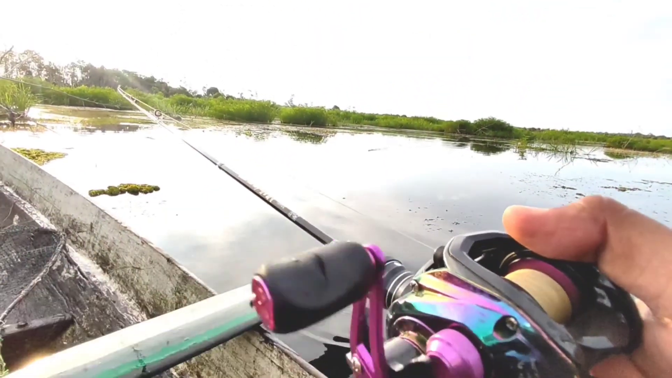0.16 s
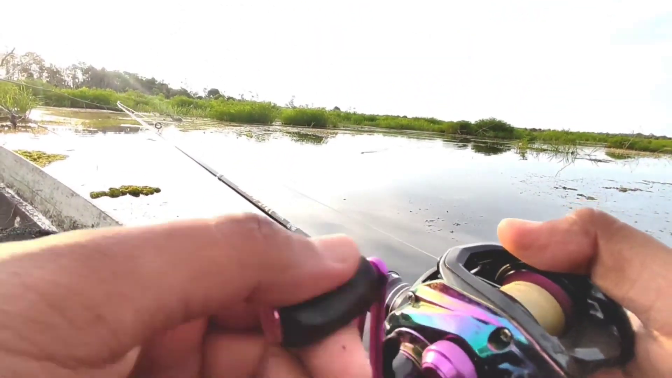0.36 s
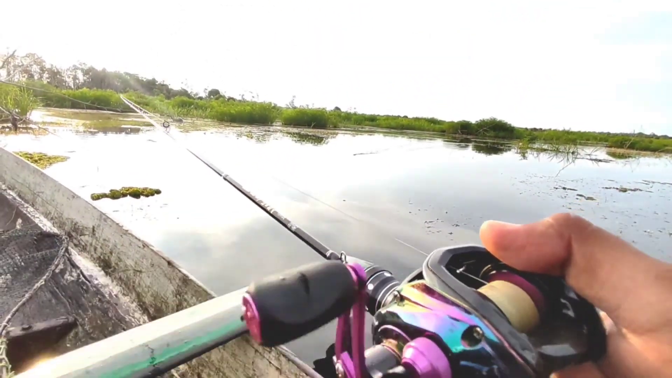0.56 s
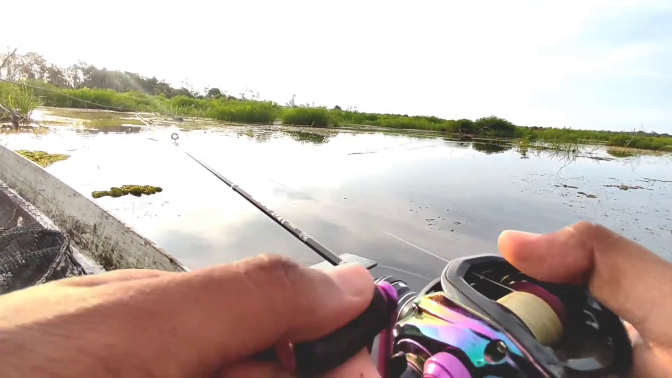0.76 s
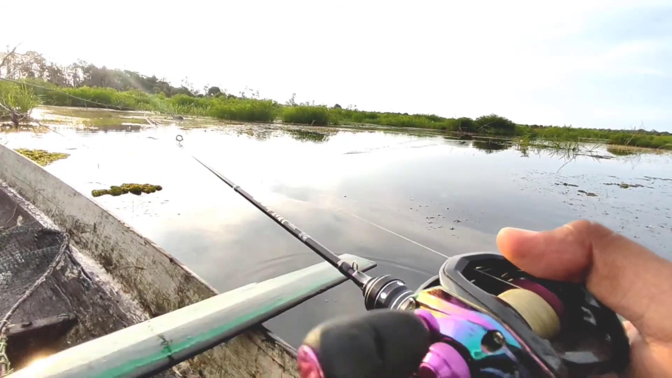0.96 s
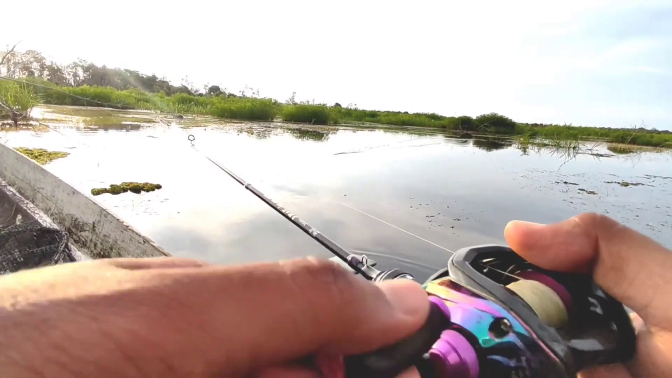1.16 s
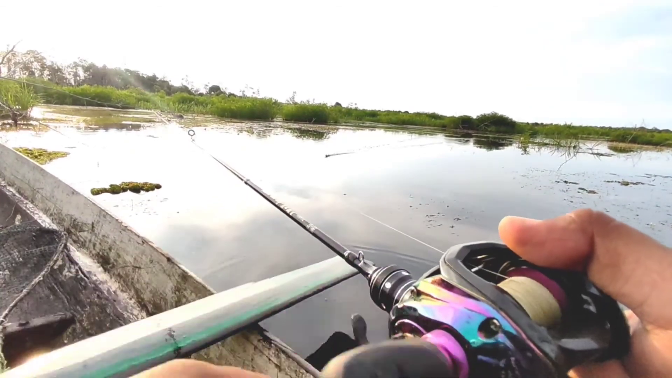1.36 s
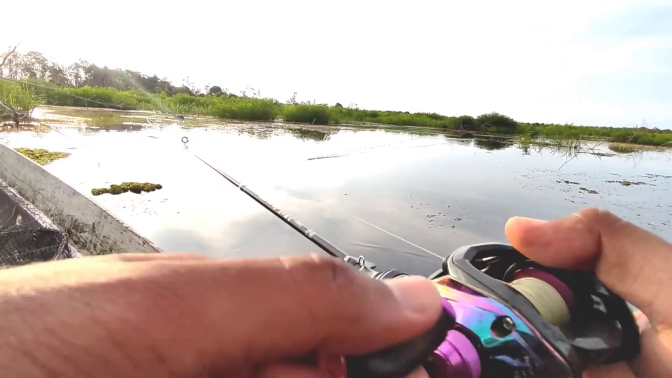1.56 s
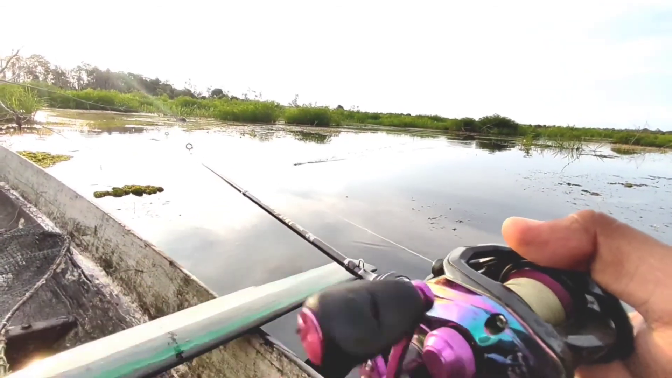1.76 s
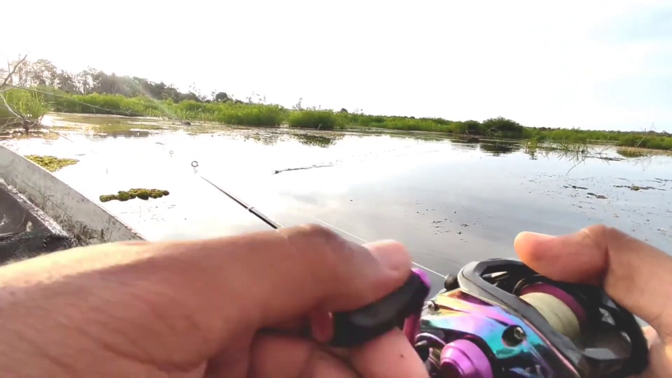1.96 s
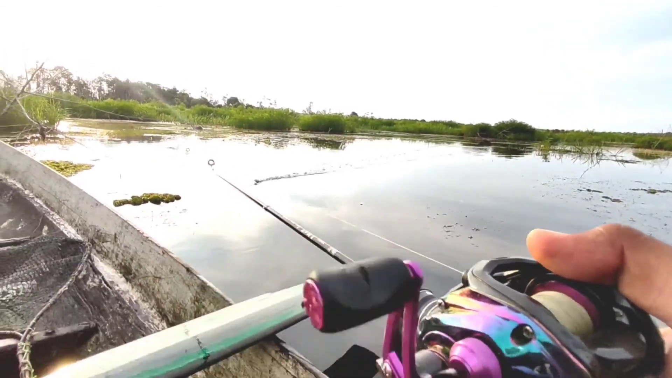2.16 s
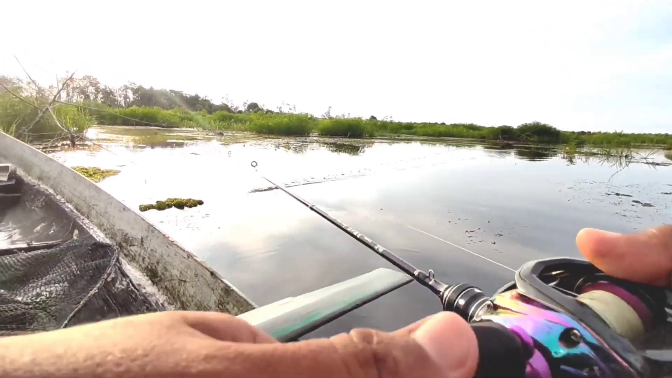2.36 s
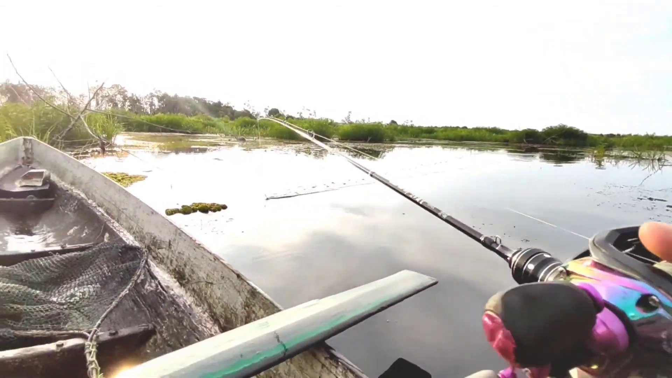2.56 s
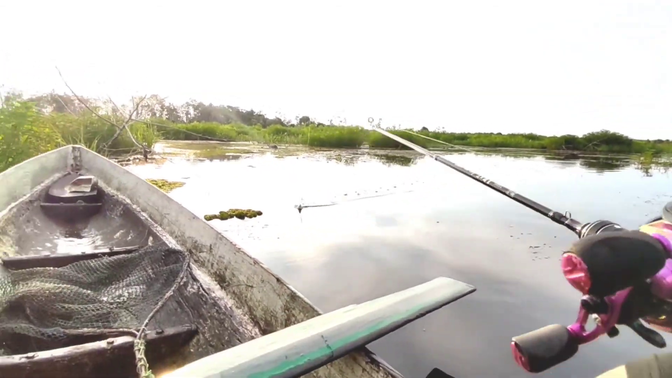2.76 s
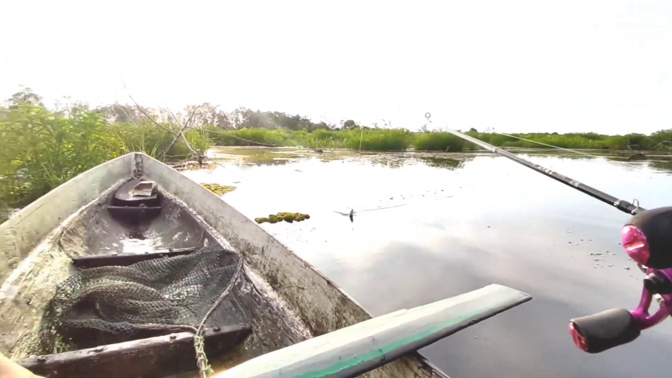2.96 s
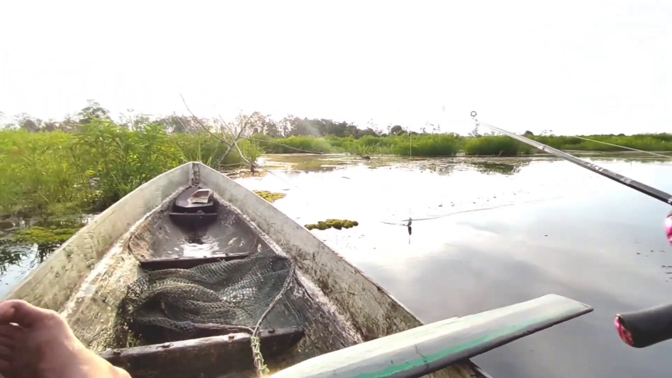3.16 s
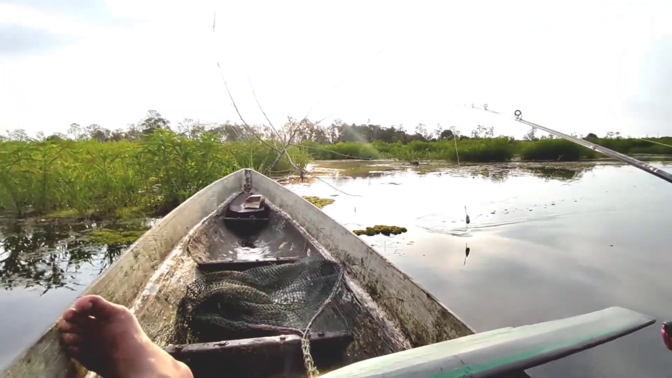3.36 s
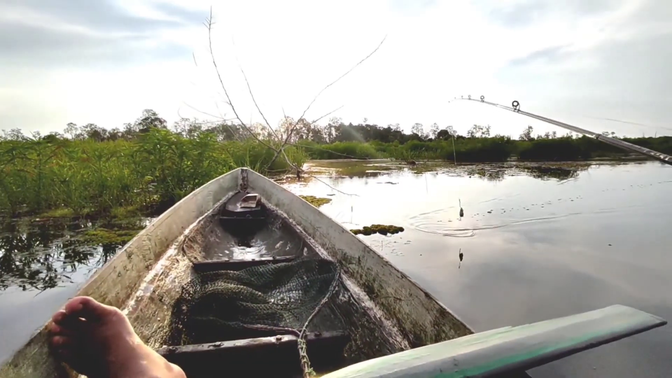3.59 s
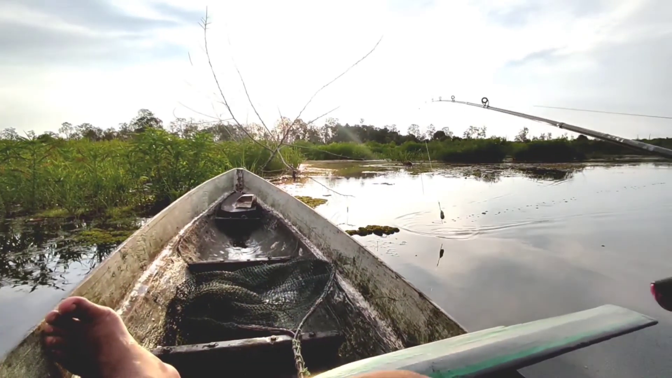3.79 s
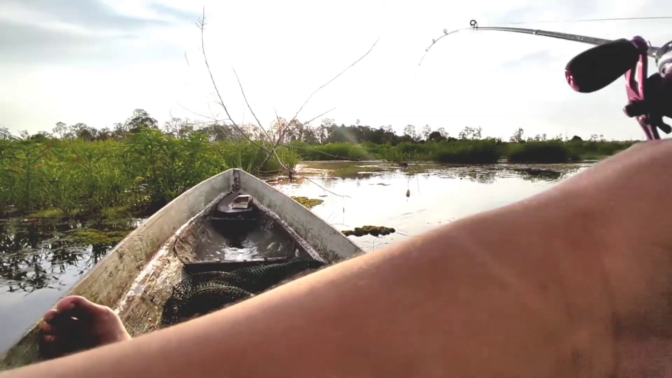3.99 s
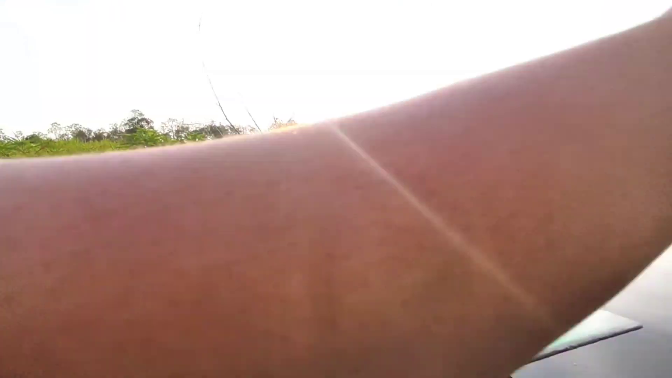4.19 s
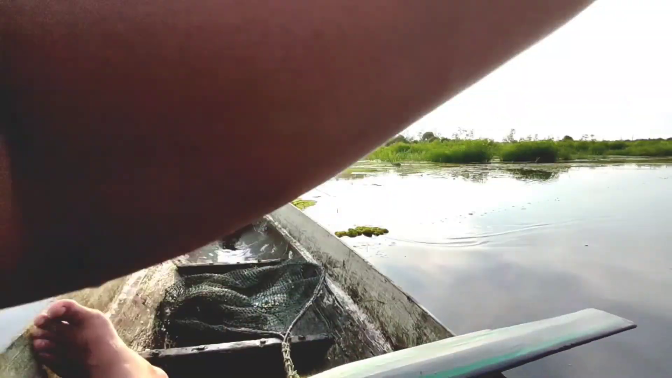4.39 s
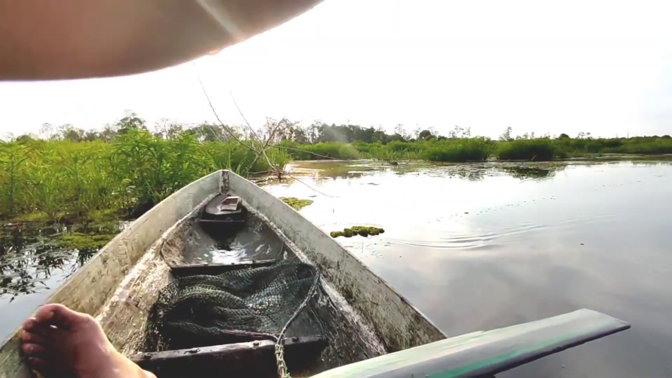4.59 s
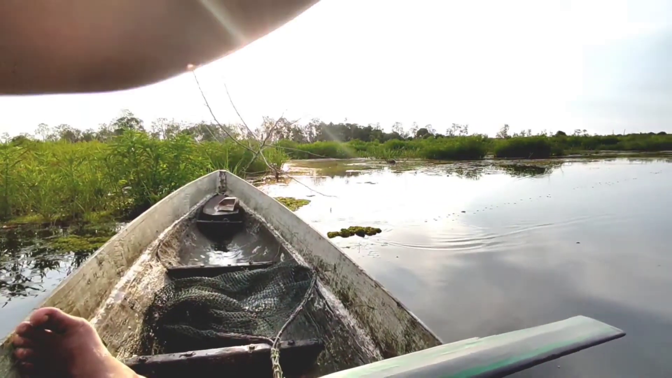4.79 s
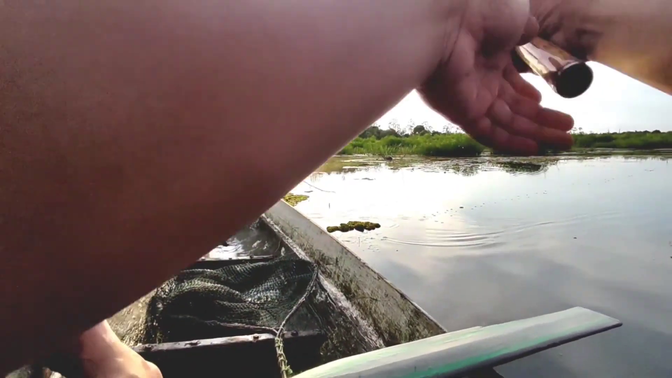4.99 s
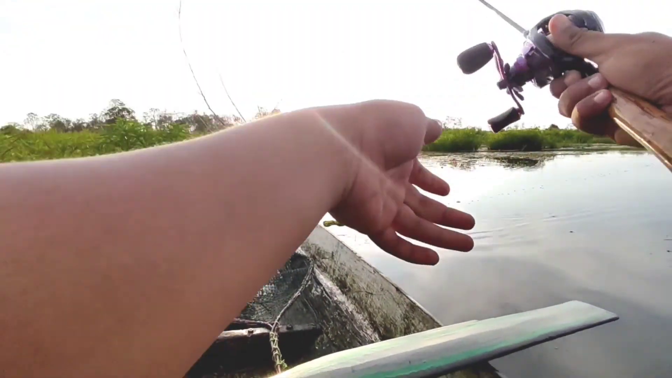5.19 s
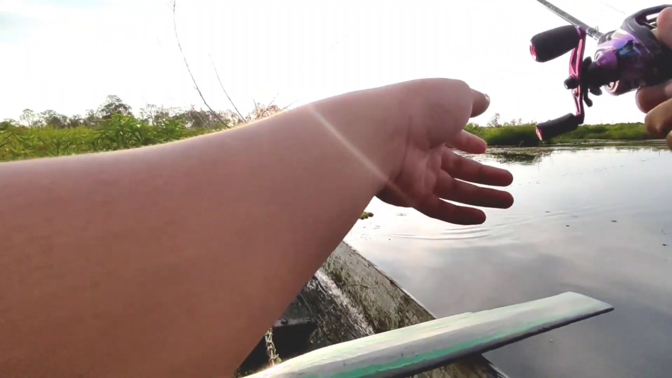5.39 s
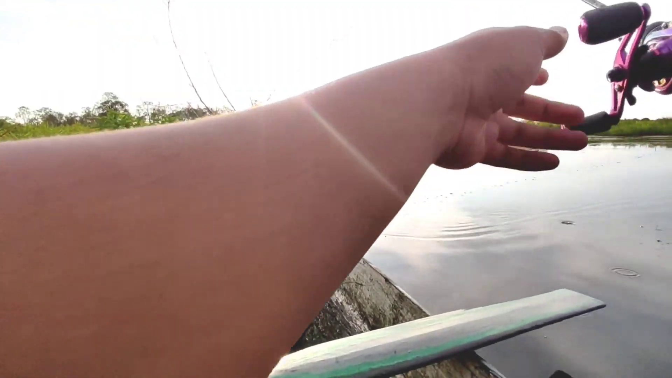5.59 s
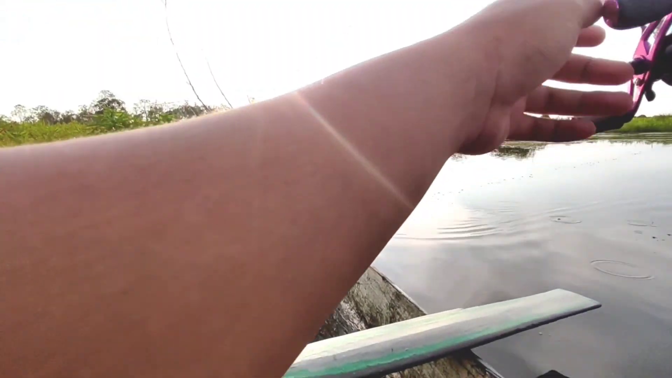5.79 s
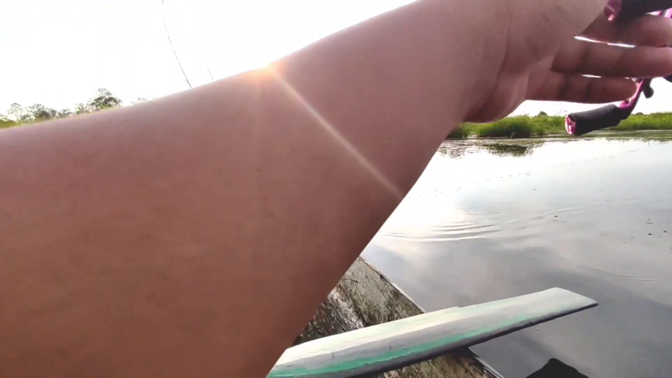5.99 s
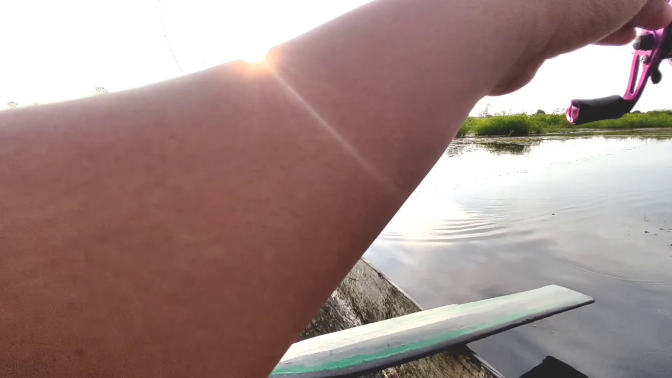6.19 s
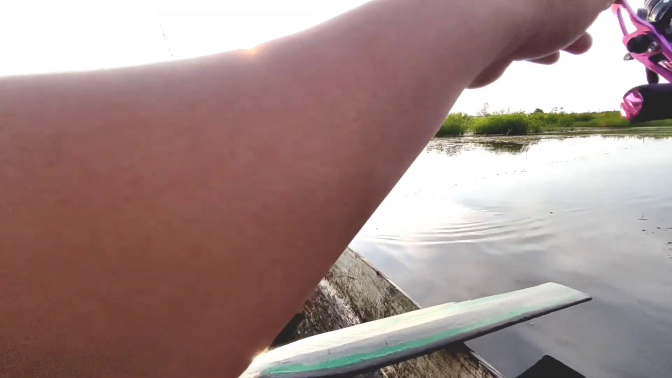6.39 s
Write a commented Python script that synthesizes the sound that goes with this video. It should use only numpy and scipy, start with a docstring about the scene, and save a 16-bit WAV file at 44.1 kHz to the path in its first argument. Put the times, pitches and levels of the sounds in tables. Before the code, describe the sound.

A fishing reel whirrs with dry ticks on a quiet marsh, then clatters to a stop; an arm rubs the microphone harshly and a knock ends it.

```python
"""A baitcasting reel whirrs and clicks in a small boat on a still marsh: coloured noise with dry ticks, plus whine.
Clicks of reel, rod, arm and finger ring short bright modes; the lure plops, then leaves the water with a soft hiss.
Behind lie marsh hiss, bird notes, insects buzzing thinly on the right and wind thumping the right port.
The angler's arm then rubs along the chest-worn camera as fluttering hiss and ringing snags;
a finger knocks the case and covers the microphone ports, which ducks the surroundings."""
import sys
import numpy as np
from scipy import signal
from scipy.fft import rfft, irfft, next_fast_len
from scipy.io import wavfile
from scipy.ndimage import uniform_filter1d

SR = 44100
rng = np.random.default_rng(int(sys.argv[2]) if len(sys.argv) > 2 else 0)


def output_pcm(signal):
    """Save a mono or channel-first signal as 16-bit PCM at the path in sys.argv[1].

    Samples are clipped to [-1, 1] before scaling.
    """
    pcm = np.clip(np.atleast_2d(signal).T, -1, 1) * 32767
    wavfile.write(sys.argv[1], SR, np.round(pcm).astype(np.int16))


N = 284445
TIME = np.arange(N) / SR

# Levels are re full scale ahead of any trim in the layer; colours are relative EQ curves.
# Open-air colour: [f/Hz, left level/dB, right level/dB]
AIR_COLOUR = [(26.6, -64.5, -57.5), (71.5, -79, -73.5), (200, -85, -90), (497, -91, -90),
              (1300, -97.5, -98.5), (2700, -95.5, -95.5), (5500, -99, -98), (6120, -103, -101),
              (7230, -97, -90.5), (8900, -85.5, -77.5), (10750, -86.5, -92.5), (11770, -93.5, -104),
              (14000, -102, -104)]
# Wind puffs: [t/s, push peak level/dB, push half width/ms, rumble level/dB, rumble rise and fall/s]
PUFFS = [(0.165, -25, 3.2, -56, 0.05), (0.713, -24, 2.5, -54, 0.05), (0.757, -22, 5, -45, 0.14),
         (1.077, -21, 6, -47, 0.08), (1.395, -26, 3, -50, 0.05), (1.548, -21, 2.2, -46, 0.06),
         (1.814, -17.5, 2.9, -45, 0.05), (1.847, -21, 3.2, -46, 0.06), (1.887, -23, 4.4, -44, 0.13),
         (2.032, -22.5, 4.2, -48, 0.08), (2.073, -21, 4.6, -47.5, 0.14), (2.278, -25, 6.4, -50, 0.06),
         (2.767, -24, 3.5, -48, 0.05), (2.804, -27, 7, -46, 0.12), (3.054, -25, 5, -50, 0.08),
         (3.354, -15.5, 2, -42, 0.08), (3.607, -17.5, 2.8, -46, 0.08), (4.2, -21.5, 4, -52, 0.04),
         (4.588, -19, 3.7, -43, 0.09), (4.638, -20, 4.5, -37.5, 0.07), (4.708, -15, 2.3, -37, 0.06),
         (4.793, -23, 5.7, -51, 0.05), (5.205, -21, 2, -45, 0.15), (5.357, -19.5, 2, -46, 0.06),
         (5.411, -15.5, 4.7, -43, 0.08), (5.457, -13.5, 2.9, -37, 0.09), (5.471, -19, 1.8, -46, 0.04),
         (5.509, -19, 2.1, -43, 0.12)]
BREEZE_DB = -58   # steady rumble under the puffs
# Louder insect bouts: [peak t/s, rise/s, fall/s, level/dB]
INSECT_BOUTS = [(3.1, 0.25, 0.7, -42), (4.92, 0.2, 1.0, -46)]
INSECT_HZ, GROUP_STROKES_PER_S, INSECT_DB = 8880, 169, -44.5   # steady buzz; stroke rate within a group
# Arm passing before the ports: [deepest t/s, rise/s, fall/s, insect loss level/dB, air and wind loss level/dB]
ARM_PASSES = [(4.4, 0.45, 0.4, 5.5, 3), (6.25, 0.35, 0.6, 17, 4.5)]

# Quick bird notes, one swell: [peak t/s, rise/s, fall/s, level/dB]
TRILL_SWELL = (3.88, 0.14, 0.18, -60)
TRILL_HZ, TRILL_SAG_HZ_PER_S, TRILL_NOTES_PER_S = 3110, 600, 40   # pitch at the peak of the swell
# Small bird's rising chirp: [start t/s, length/s, start f/Hz, end f/Hz, level/dB]
CHIRP = (4.738, 0.04, 2900, 3900, -59)
# Nasal bird call, one swell: [peak t/s, rise/s, fall/s, level/dB]
CALL_SWELL = (3.335, 0.155, 0.034, -49.5)
# Its fundamental, which dips, recovers and sags: [t/s, f/Hz]
CALL_PITCH = [(3.2, 852), (3.218, 842), (3.248, 860), (3.27, 812), (3.288, 864), (3.322, 846), (3.352, 820)]
# Resonances of the bird's throat: [f/Hz, level/dB]
THROAT = [(1700, -14), (2500, 0), (3350, -3.5), (4200, -2), (5100, -3.5), (5720, 4), (6050, -10),
          (6800, -13), (8200, -4), (8700, -9)]

# Bubbles where the lure plops at the surface: [t/s, starting f/Hz, level/dB]
PLOPS = [(1.571, 1040, -41), (1.756, 1930, -40), (1.802, 1080, -43), (1.809, 1450, -49), (2.033, 1040, -42),
         (2.036, 1370, -42), (2.165, 1090, -46), (2.185, 1380, -48)]
# Lure drawn out of the water, one swell: [peak t/s, rise/s, fall/s, level/dB]
LURE_SWELL = (3.13, 0.22, 0.27, -56)

# Light cloth rustles as the arm rises: [peak t/s, rise/s, fall/s, level/dB]
RUSTLES = [(3.73, 0.08, 0.08, -44.5), (3.95, 0.2, 0.18, -41)]
# Rustle colour: [f/Hz, left level/dB, right level/dB]
RUSTLE_COLOUR = [(150, 0, -4), (800, -9, -9.5), (1490, -15, -14), (3100, -11, -9), (4700, -12, -16),
                 (8400, -9, 0), (10800, 5.5, -5), (12300, -2, -10), (13300, 4.5, -7)]
# Arm on camera, a brush, long stroke, harder push and last slide: [peak t/s, rise/s, fall/s, level/dB]
RUBS = [(4.995, 0.1, 0.08, -40), (5.42, 0.55, 0.81, -32.6), (5.55, 0.1, 0.1, -34), (5.93, 0.2, 0.25, -39)]
# Colour of rubbing skin and cloth: [f/Hz, left level/dB, right level/dB]
RUB_COLOUR = [(260, -28, -24), (850, -19.5, -24), (1360, -35, -30), (1850, -21, -22), (3300, -25, -25),
              (4650, -26, -26), (5400, -15.5, -16.5), (6900, -19, -20), (8150, -10, 0), (9500, -5, -6),
              (10660, 3.5, -9), (13000, -13, -24), (14100, -5, -17)]
# Microphone port resonances, left then right: [f/Hz, t60 of one resonator/s]
PORTS = [(10530, 0.0022), (8850, 0.0027)]
# Big snags at the left port: [t/s, peak level/dB]
SNAGS = [(5.371, -13), (5.379, -13), (5.407, -12), (5.4205, -14), (5.4298, -9), (5.4724, -4.5),
         (5.4882, -8), (5.4985, -7), (5.5095, -10), (5.5145, -10), (5.5635, -13), (5.5855, -11),
         (5.598, -9), (5.6775, -12), (5.718, -12)]
# Skin chattering across the right port: [peak t/s, rise/s, fall/s, level/dB]
CHATTERS = [(5.285, 0.15, 0.09, -25.3), (5.66, 0.12, 0.13, -29.5)]
# Dull scuffs where the arm presses: [peak t/s, rise/s, fall/s, level/dB]
SCUFFS = [(5.0, 0.11, 0.1, -38.5), (5.14, 0.12, 0.25, -44)]
# Dull body colour of scuffs and clicks: [f/Hz, left level/dB, right level/dB]
BODY_COLOUR = [(200, -14, -21), (400, -11.5, -7.5), (770, -1, 2), (1330, -7.5, -9), (2760, 0, -3.5),
               (5730, -1, 0), (7940, 1, -3), (12000, -27, -17)]
# Ringing hollows between arm and camera: [peak t/s, rise/s, fall/s, level/dB, f at peak/Hz, glide/Hz per s]
HOLLOWS = [(5.38, 0.28, 0.6, -47, 3970, -400), (5.53, 0.4, 0.45, -48.3, 2650, 100),
           (5.6, 0.35, 0.4, -55, 1880, 0)]
# Faint hum of rubbed skin, one swell: [peak t/s, rise/s, fall/s, level/dB]
HUM_SWELL = (5.28, 0.33, 0.27, -55)
HUM_HZ, HUM_SAG_HZ_PER_S = 253, 135   # pitch at the peak of the swell, sinking as the arm slows

# Knocks on the camera case: [t/s, blow level/dB]
KNOCKS = [(4.0238, -35.5), (6.288, -31), (6.3283, -11.5)]
# Modes of the struck case: [f/Hz, level/dB, t60/s]
CASE_MODES = [(620, -18, 0.018), (830, -17, 0.016), (2860, -14.5, 0.02), (5240, 3, 0.015),
              (8050, -8, 0.028), (9300, 2, 0.017), (11750, 4, 0.014)]
# Finger pressing the left port, then shifting: [t/s, pressure step re full scale, leak time/s]
PRESSES = [(6.328, -0.5, 0.011), (6.4287, 0.5, 0.07)]
PRESS_RISE_S, MIC_LOW_CUT_HZ = 0.002, 3
COVER_S, COVER_DB = 6.35, -18   # the finger covers the ports

# Stopped handle rattling in its play: [t/s, first bounce level/dB, loss per bounce level/dB]
RATTLES = [(2.4817, -22, 1.8), (2.5502, -35, 6)]
BOUNCE_S = 0.0026   # nominal spacing
# Modes of the handle: [f/Hz, level/dB, t60/s]
HANDLE_MODES = [(1222, -24, 0.09), (1540, -22, 0.025), (2150, -17, 0.02), (3400, -13, 0.022),
                (5604, -11, 0.022), (6794, -5, 0.02), (8043, -2, 0.02), (8750, -1, 0.013), (9878, 0, 0.02),
                (10600, 1, 0.017), (11250, -3, 0.018)]
# Clicks of reel and rod, then of arm and finger on the camera: [t/s, onset level/dB, decay/ms,
# left-right level/dB, body level re onset/dB, f of the touched part/Hz, level of its ring/dB]
CLICKS = [(0.278, -41, 1.5, -2, 3, 2500, -40), (0.331, -37, 2, -1, -7, 2300, -37),
          (0.441, -29.5, 1.2, -6, -2, 4200, -32), (0.972, -39, 2, -7, 2, 4400, -40),
          (1.2441, -21, 1.5, -5, -19, 7900, -22), (1.394, -44, 2, 0, 5, 3700, -42),
          (1.498, -36, 1.8, 3, -3, 3700, -35), (2.046, -35, 2.5, -3, -6, 2400, -36),
          (2.1567, -28, 1.2, -3, -12, 8550, -18), (2.4664, -26, 1.7, -4, -9, 2050, -29),
          (2.470, -31, 2, 2, -4, 6300, -34), (2.4815, -19, 3, 2, -15, 10600, -18),
          (2.4864, -28, 7, -5, -5, 3400, -30), (2.5392, -17, 2.1, -4, -22, 7900, -16),
          (2.5505, -29, 2.5, -1, -5, 2750, -29), (2.6014, -30, 2.3, -1, -16, 4100, -39),
          (2.7338, -24, 2.3, 4, -20, 5400, -19), (2.7346, -30, 1.5, 4, -20, 7200, -20),
          (2.7933, -33.5, 1.9, 4, -10, 8850, -27), (2.8601, -31, 2.5, 12, -14, 3200, -42),
          (2.9208, -30, 2.2, 14, -14, 5400, -40), (4.0198, -5.5, 1.4, 24, -26, 3100, -20),
          (4.0234, -9, 1.9, 0, -20, 8800, -10), (4.026, -14, 1.2, 6, -22, 3500, -26),
          (4.9116, -27, 1.6, 3, -6, 6300, -34), (4.925, -30, 2.4, 8, -3, 900, -33),
          (5.014, -26, 3, 3, -3, 6300, -28), (5.665, -22, 1, 0, -30, 8750, -15),
          (5.8485, -19, 1.2, -4, -30, 7200, -18), (6.0786, -21, 2.3, 13, -21, 11000, -22),
          (6.256, -52, 7, 3, 7, 1450, -44), (6.2878, -23, 2.3, 5, -16, 2800, -28),
          (6.328, -1.5, 1.6, 9.5, -13, 2860, -17)]
# Bright colour of a click: [f/Hz, left level/dB, right level/dB]
CLICK_COLOUR = [(300, -41, -25), (900, -28, -33), (1600, -33, -16), (3100, -19.5, -9), (4360, -19.5, -11),
                (6020, -9, -12), (8780, -9.5, 7.5), (10470, 5, -12), (13440, -15, -29), (14200, -12, -23)]
# Bright short modes rung by every click, of reel or camera: [f/Hz, level/dB, t60/s]
CLICK_MODES = [(2280, -21, 0.011), (3107, -20, 0.011), (4020, -22, 0.009), (5540, -17, 0.01),
               (6800, -19, 0.0067), (8790, -6, 0.01), (11200, -12, 0.0054)]
# random ticks while the handle turns
FAINT_TICKS_PER_S, FAINT_TICK_DB, FAINT_TICK_MS, FAINT_BODY_DB = 5, -44, 2.2, -1
# Colour of gears and running line: [f/Hz, left level/dB, right level/dB]
WHIRR_COLOUR = [(300, -17, -20), (700, -5.5, -10.5), (1300, -7, -9.5), (1520, -5, -1.5), (2600, -5, -3),
                (3520, -7.5, -6), (4500, -9, -9), (6450, -10, -11), (8600, -19, 3), (9800, -17.5, 1.5),
                (11000, -9, -20), (12300, -20, -10), (14000, -18, -18)]
# Handle pushes that make the gears whine: [slowest t/s, speed-up time/s, slowest f/Hz, fastest f/Hz, level/dB]
HANDLE_PUSHES = [(1.94, 0.22, 2290, 3150, -60), (2.325, 0.15, 2370, 2950, -54.5)]
CRANK_STOP_S, CRANK_RUN_DOWN_S = 2.57, 0.12   # end of the whirr and length of its fade
CUTOFF_HZ = 14400   # top of the final low-pass


def from_db(db):
    """Decibels to gain."""
    return 10 ** (np.asarray(db) / 20)


def rms_one(x):
    """Scale to unit rms."""
    return x / np.sqrt(np.mean(x ** 2) + 1e-20)


def panned(pan_db):
    """Left and right gains for a left-minus-right level difference."""
    gains = from_db([[pan_db / 2], [-pan_db / 2]])
    return rms_one(gains)


def drift(rate):
    """Smooth random modulation of spread 1, low-passed near a rate in Hz."""
    step = 40   # samples between computed points
    pole = np.exp(-2 * np.pi * rate * step / SR)
    settle = 2000   # points dropped while the filter settles
    noise = rng.standard_normal(N // step + settle + 2)
    slow = signal.lfilter([1], [1, -2 * pole, pole * pole], noise)[settle:]
    return np.interp(np.arange(N) / step, np.arange(len(slow)), rms_one(slow))


def tone(hz):
    """A sine that follows a pitch."""
    return np.sin(2 * np.pi * np.cumsum(hz) / SR)


def ring(blows, hz, t60):
    """A damped resonator: a unit blow starts a decaying sine of height 1."""
    radius, angle = from_db(-60 / (t60 * SR)), 2 * np.pi * hz / SR
    feedback = [1, -2 * radius * np.cos(angle), radius * radius]
    return signal.lfilter([0, np.sin(angle)], feedback, blows + 1e-18)


def port_ping(x, hz, t60):
    """A cavity resonance met twice: a ping that swells and dies."""
    return ring(ring(x, hz, t60), hz, t60)


def stereo_noise(shared):
    """White noise of which a share of the power is common to both ports."""
    shared = np.clip(shared, 0, 1)
    common = np.sqrt(shared) * rng.standard_normal(N)
    return common + np.sqrt(1 - shared) * rng.standard_normal((2, N))


def coloured(x, spectrum):
    """EQ each channel to its own spectrum; rms 1."""
    hz, *sides = np.transpose(spectrum)
    size = next_fast_len(N)
    log_hz = np.log(np.fft.rfftfreq(size, 1 / SR) + 1)
    gain = from_db([np.interp(log_hz, np.log(hz), side) for side in sides])
    return rms_one(irfft(rfft(x, size) * gain, size)[:, :N])


def band(x, low_hz, high_hz):
    """Band-pass with second-order skirts."""
    return signal.sosfilt(signal.butter(2, [low_hz, high_hz], "band", fs=SR, output="sos"), x)


def shifting(x, depth_db, rate, count=16):
    """Each band of a scrape swells and fades on its own; rms 1."""
    size = next_fast_len(N)
    log_hz = np.log(np.fft.rfftfreq(size, 1 / SR) + 1)
    place = np.interp(log_hz, np.log([700, 14000]), [0, count - 1])
    whole = rfft(x, size)
    total = 0
    for k in range(count):
        overlap = np.clip(1 - abs(place - k), 0, 1)
        part = irfft(whole * overlap, size)[:, :N]
        total = total + part * from_db(depth_db * drift(rate))
    return rms_one(total)


def swell(peak_s, rise_s, fall_s):
    """A rounded rise from zero to one and a rounded fall back."""
    away = np.maximum((peak_s - TIME) / rise_s, (TIME - peak_s) / fall_s)
    return np.sin(np.pi / 2 * np.clip(1 - away, 0, 1))


def swells(rows, taper=1):
    """The gain of several swells, added in power; a higher taper makes them more pointed."""
    return np.sqrt(sum((from_db(db) * swell(*timing) ** taper) ** 2 for *timing, db in rows))


def air(level_db=-41.5, waver_db=0.8):
    """Distant marsh hiss over a soft rumble: coloured noise with a slow waver."""
    return from_db(level_db + waver_db * drift(2.84)) * coloured(stereo_noise(shared=0.1), AIR_COLOUR)


def wind(push_db=-3, pan_db=-22):
    """Each puff is a push between two shallow dips, inside a swell of lumpy rumble."""
    turbulence = signal.lfilter([1], [1, -.99], rng.standard_normal(N)) * from_db(2 * drift(12))
    gusts = swells([(s, spread_s, spread_s, rumble_db) for s, _, _, rumble_db, spread_s in PUFFS])
    out = np.hypot(from_db(BREEZE_DB), gusts) * rms_one(band(turbulence, 21.5, 159))
    for s, db, width_ms, _, _ in PUFFS:
        near = slice(max(round(s * SR) - SR // 10, 0), round(s * SR) + SR // 10)
        u = (TIME[near] - s) * 1000 / width_ms
        push = 1.5 * np.exp(-u ** 2) - .5 * np.exp(-(u / 3) ** 2)
        out[near] += from_db(db + push_db) * push
    return out * panned(pan_db)


def insect(level_db, pan_db, pulse_s=0.00098, rasp=0.58):
    """Each stroke is a short rasping tone; strokes come in groups of four to seven with a pause between."""
    strokes, start = np.zeros(N), 0
    counts = rng.choice([4, 4, 4, 5, 7], 300)
    pauses = rng.uniform(1, 1.4, 300)   # in stroke periods
    for count, pause in zip(counts, pauses):
        at = ((start + np.arange(count)) / GROUP_STROKES_PER_S * SR).astype(int)
        strokes[at[at < N]] = 1
        start += count + pause
    pulses = signal.fftconvolve(strokes, signal.windows.gaussian(401, pulse_s * SR), "same")
    rasp_noise = rms_one(band(rng.standard_normal(N), 8210, 9470))
    buzz = tone(INSECT_HZ + 90 * drift(151.6)) + rasp * rasp_noise
    effort = np.hypot(from_db(INSECT_DB), swells(INSECT_BOUTS, taper=1.5))
    return from_db(level_db) * effort * rms_one(pulses * buzz) * panned(pan_db)


def trill(note_depth_db=8, uneven_db=3, jitter_hz=70):
    """Quick, rough notes of uneven strength pulse one tone of sinking pitch."""
    t = TIME - TRILL_SWELL[0]
    notes = from_db(note_depth_db * np.cos(2 * np.pi * TRILL_NOTES_PER_S * t) + uneven_db * drift(30))
    hz = TRILL_HZ - TRILL_SAG_HZ_PER_S * t + jitter_hz * drift(150)
    return swells([TRILL_SWELL]) * notes * tone(hz)


def chirp():
    """One quick upward sweep."""
    s, length_s, start_hz, end_hz, db = CHIRP
    half_s = length_s / 2
    hz = np.interp(TIME, [s, s + length_s], [start_hz, end_hz])
    return swells([(s + half_s, half_s, half_s, db)]) * tone(hz)


def nasal_call(flutter_db=3, jitter_hz=6, onset_taper=0.25, taper_per_partial=0.14, lag_s=0.000412):
    """Partials slide through throat resonances, high ones growing in later; the right lags, so the bird is left."""
    hz = np.interp(TIME, *np.transpose(CALL_PITCH)) + jitter_hz * drift(120)
    out = 0
    for k in range(2, 11):   # no fundamental
        effort = swells([CALL_SWELL], taper=abs(onset_taper) + abs(taper_per_partial) * (k - 2))
        throat_db = np.interp(k * hz, *np.transpose(THROAT))
        out = out + effort * from_db(throat_db + flutter_db * drift(40)) * tone(k * hz)
    return np.array([out, np.interp(TIME - lag_s, TIME, out)])


def plops(decay_s=0.0036, rise_per_s=8, level_db=-1.5, wobble=0.05):
    """Each bubble swells, wobbles and rises in pitch."""
    out, t, unrest = np.zeros(N), TIME[:SR // 10], 1 + wobble * drift(200)
    envelope = t / decay_s * np.exp(1 - t / decay_s)
    for s, hz, db in PLOPS:
        life = slice(round(s * SR), round(s * SR) + len(t))
        pitch = hz * (1 + rise_per_s * t) * unrest[life]
        out[life] += from_db(db + level_db) * envelope * tone(pitch)
    return out


def lure(grain_db=3, low_hz=250, high_hz=6500):
    """Water streams off the lure in fine splashes: band-passed, grainy noise."""
    splashes = stereo_noise(shared=0.1) * from_db(grain_db * drift(150))
    return swells([LURE_SWELL]) * rms_one(band(splashes, low_hz, high_hz))


def rustle(grain_db=2):
    """Cloth slides lightly beside the camera: grainy coloured noise."""
    return swells(RUSTLES) * from_db(grain_db * drift(200)) * coloured(stereo_noise(shared=0.11), RUSTLE_COLOUR)


def rubbing(hiss_db=3.6, snag_db=-1, snags_per_s=220, slips_per_s=170, uneven_db=0.8):
    """Fluttering stick-slip hiss; snags and chattering slips set the microphone ports ringing."""
    effort = swells(RUBS, taper=1.3) * from_db(uneven_db * drift(14))
    grip = from_db(1.5 * drift(45) + 2.3 * drift(450))
    hiss = coloured(stereo_noise(shared=0.27) * grip, RUB_COLOUR)
    out = effort * from_db(hiss_db) * shifting(hiss, depth_db=2.5, rate=16)
    # random small snags, then the big ones, at the left port
    strengths = from_db(3.5 * np.minimum(rng.exponential(1, N), 2.5))
    small = (rng.random(N) < snags_per_s / SR) * strengths
    out[0] += effort * from_db(snag_db) * rms_one(port_ping(small, *PORTS[0]))
    big = np.zeros(N)
    for s, db in SNAGS:
        big[round(s * SR)] = from_db(db)
    ping_peak = port_ping(1. * (TIME == 0), *PORTS[0]).max()
    out[0] += port_ping(big, *PORTS[0]) / ping_peak
    # slips at an unsteady rate at the right port
    slip_count = np.floor(np.cumsum(slips_per_s * from_db(8.9 * drift(200))) / SR)
    slips = np.diff(slip_count, prepend=0)
    out[1] += swells(CHATTERS, taper=1.8) * rms_one(port_ping(slips, *PORTS[1]))
    return out + swells(SCUFFS) * coloured(stereo_noise(shared=0.1) * grip, BODY_COLOUR)


def hollows(width_hz=450, wander_hz=90, flutter_db=2.5, grain_db=3):
    """Friction noise rings in narrow bands that glide, wander and flutter as the contact slides on."""
    out, narrow = 0, signal.butter(2, width_hz / 2, fs=SR, output="sos")
    for s, rise_s, fall_s, db, hz, glide in HOLLOWS:
        centre = hz + glide * (TIME - s) + wander_hz * drift(10)
        # complex low-passed noise, shifted up to the moving centre
        noise = signal.sosfilt(narrow, stereo_noise(shared=0.3) + 1j * stereo_noise(shared=0.3))
        ringing = rms_one(np.real(noise * np.exp(2j * np.pi * np.cumsum(centre) / SR)))
        uneven = from_db(flutter_db * drift(18) + grain_db * drift(150))
        out = out + swells([(s, rise_s, fall_s, db)]) * uneven * ringing
    return out


def skin_hum(rough_db=3):
    """Slow stick and slip of skin on the case, a rough tone of sinking pitch."""
    hz = HUM_HZ - HUM_SAG_HZ_PER_S * (TIME - HUM_SWELL[0]) + 6 * drift(32)
    return swells([HUM_SWELL], taper=1.5) * from_db(rough_db * drift(30)) * tone(hz)


def knocks(pan_db=2):
    """Hard touches ring the modes of the camera case."""
    blows = np.zeros(N)
    for s, db in KNOCKS:
        blows[round(s * SR)] = from_db(db)
    return panned(pan_db) * sum(ring(blows, hz, t60) * from_db(db) for hz, db, t60 in CASE_MODES)


def finger(right_db=-28):
    """Each press puts a step of pressure on the left port, which leaks away; the right gets a faint copy."""
    pressure = np.zeros(N)
    for s, step, leak_s in PRESSES:
        t = np.maximum(TIME - s, 0)
        pressure += step * (1 - np.exp(-t / PRESS_RISE_S)) * np.exp(-t / leak_s)
    thump = signal.sosfilt(signal.butter(1, MIC_LOW_CUT_HZ, "high", fs=SR, output="sos"), pressure)
    return np.array([thump, from_db(right_db) * thump])


def rattle(pan_db=2, count=6):
    """The handle bounces to rest; every bounce meets each mode with a strength of its own."""
    bounces = []
    for s, db, loss_db in RATTLES:
        for k in range(count):
            bounces.append((s + BOUNCE_S * (k + rng.uniform(0, .3)), db - loss_db * k))
    s, db = np.transpose(bounces)
    out = np.zeros((2, N))
    for hz, mode_db, t60 in HANDLE_MODES:
        blows = np.zeros((2, N))
        strengths = from_db(db + mode_db + rng.normal(0, 2, (2, len(s))))
        blows[:, (s * SR).astype(int)] = strengths * rng.choice([-1, 1], (2, len(s)))
        out += ring(blows, hz, t60)
    return out * panned(pan_db)


def faint_ticks(low_hz=2200, high_hz=5000):
    """Small random clicks of the turning reel, as rows like those of CLICKS."""
    chances, pitches = rng.random(N), rng.uniform(low_hz, high_hz, N)
    born = (chances < FAINT_TICKS_PER_S / SR) & (TIME < CRANK_STOP_S)
    return [(s, FAINT_TICK_DB, FAINT_TICK_MS, -4, FAINT_BODY_DB, hz, FAINT_TICK_DB)
            for s, hz in zip(TIME[born], pitches[born])]


def clicks(level_db=1, tail_db=-28, tail_ms=10, ring_db=-4, shared=0.12, part_t60=0.012):
    """Each click rings the touched part and short bright modes, then rattles on, bright over a duller body."""
    bright, dull, blows, parts = np.zeros((4, 2, N))
    for s, db, decay_ms, pan_db, body_db, part_hz, part_db in CLICKS + faint_ticks():
        at = round(s * SR)
        t = TIME[:min(SR // 10, N - at)]
        life = slice(at, at + len(t))
        ms = t * 1000
        fall = from_db(db) * (np.exp(-ms / decay_ms) + from_db(tail_db) * np.exp(-ms / tail_ms))
        bright[:, life] += fall * panned(pan_db)
        dull[:, life] += fall * from_db(body_db)
        blows[:, at:at + 1] += from_db(db) * panned(pan_db)
        parts[:, life] += from_db(part_db) * panned(pan_db) * ring(1. * (t == 0), part_hz, part_t60)
    contacts = bright * coloured(stereo_noise(shared), CLICK_COLOUR)
    contacts = contacts + dull * coloured(stereo_noise(shared), BODY_COLOUR)
    # every blow meets each mode with a strength of its own
    modes = sum(ring(blows * from_db(db + 2 * drift(30)), hz, t60) for hz, db, t60 in CLICK_MODES)
    rings = parts + from_db(ring_db) * modes
    rings[1] = np.roll(rings[1], 1)   # reaches the right port one sample later
    return from_db(level_db) * contacts + band(rings, 900, 18000)


def reel(whirr_db=-50.3, uneven_db=0.6, grain_db=3.0, ticks_per_s=70, tick_db=-8):
    """Gear teeth and running line whirr with dry ticks; a faint whine follows the speed of each handle push."""
    teeth = stereo_noise(shared=0.086) * from_db(grain_db * drift(200))
    ticks = (rng.random((2, N)) < ticks_per_s / SR) * rng.standard_normal((2, N))
    cranking = np.clip((CRANK_STOP_S - TIME) / CRANK_RUN_DOWN_S, 0, 1)
    whirr = coloured(teeth + from_db(tick_db) * rms_one(ticks), WHIRR_COLOUR)
    out = from_db(whirr_db + uneven_db * drift(4)) * cranking * whirr
    for s, push_s, slow_hz, fast_hz, db in HANDLE_PUSHES:
        speed = np.sin(np.pi / 2 * (TIME - s) / push_s) ** 2
        effort = swell(s + push_s / 2, push_s, 0.65 * push_s)
        whine_hz = slow_hz + (fast_hz - slow_hz) * speed + 40 * drift(200)
        out = out + from_db(db + 2 * drift(40)) * effort * tone(whine_hz)
    return out


def scene():
    """The passing arm screens air, wind and insects; the finger over the ports ducks everything outside."""
    insects = insect(level_db=0.5, pan_db=-47.5) + insect(level_db=-4, pan_db=-21)
    insects = band(insects, 8460, 9280)   # the insects' sounding body passes one narrow band
    insect_loss_db = sum(db * swell(*timing) for *timing, db, _ in ARM_PASSES)
    air_loss_db = sum(db * swell(*timing) for *timing, _, db in ARM_PASSES)
    covered = uniform_filter1d(1. * (TIME > COVER_S), size=600)   # softened switch
    outside = from_db(-air_loss_db) * (air() + wind()) + from_db(-insect_loss_db) * insects
    outside = outside + plops() + nasal_call() + trill() + chirp() + lure()
    handling = rustle() + rubbing() + hollows() + skin_hum()
    contacts = clicks() + rattle() + knocks() + finger()
    return outside * from_db(COVER_DB * covered) + reel() + handling + contacts


def record(dry):
    """Soft saturation rounds the loudest peaks; a steep low-pass cuts the top."""
    low_pass = signal.ellip(10, .2, 80, CUTOFF_HZ, fs=SR, output="sos")
    return signal.sosfilt(low_pass, np.tanh(dry))


dry = scene()
out = record(dry)
output_pcm(out)
```